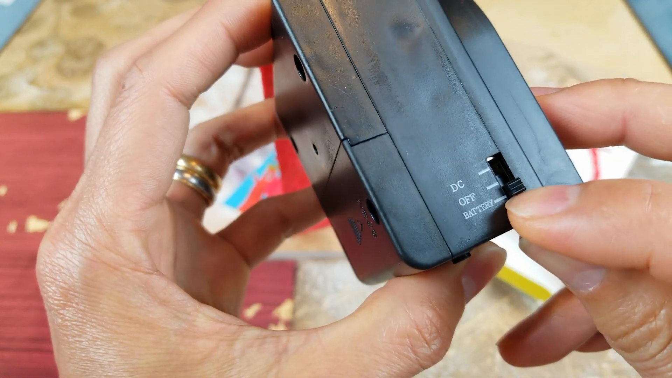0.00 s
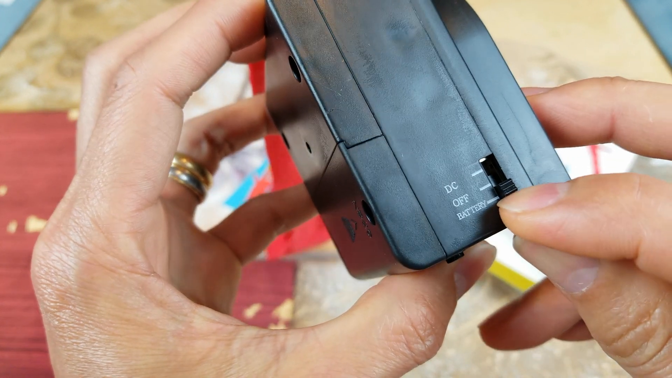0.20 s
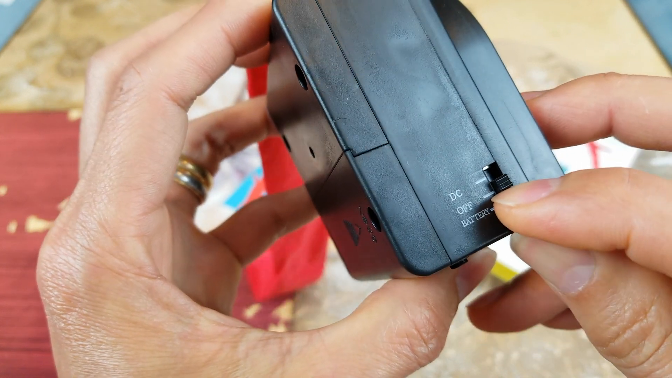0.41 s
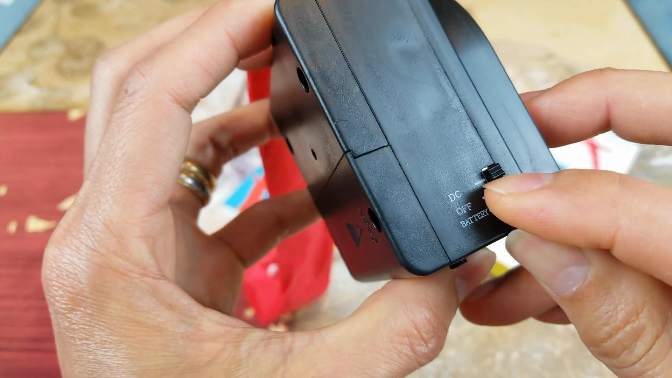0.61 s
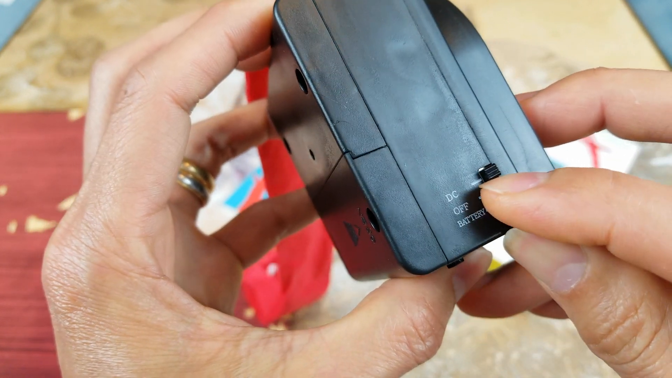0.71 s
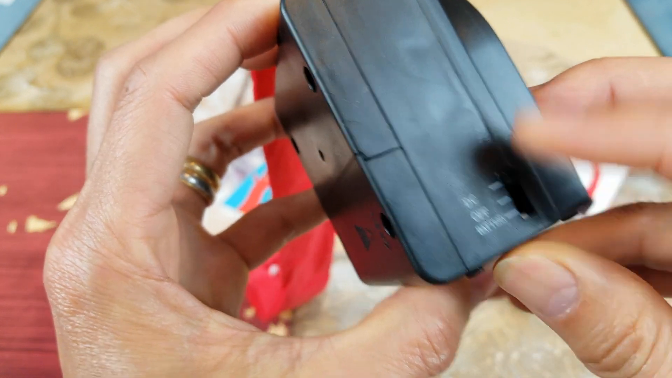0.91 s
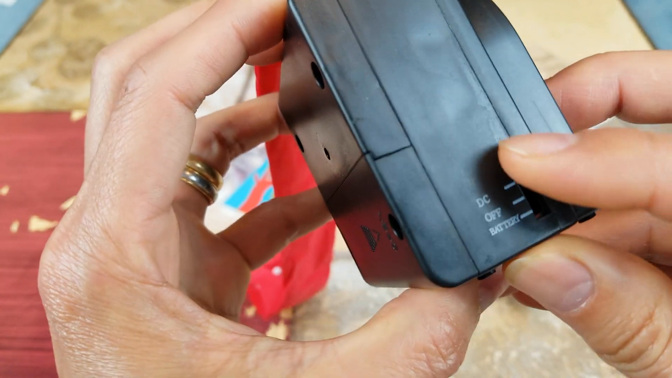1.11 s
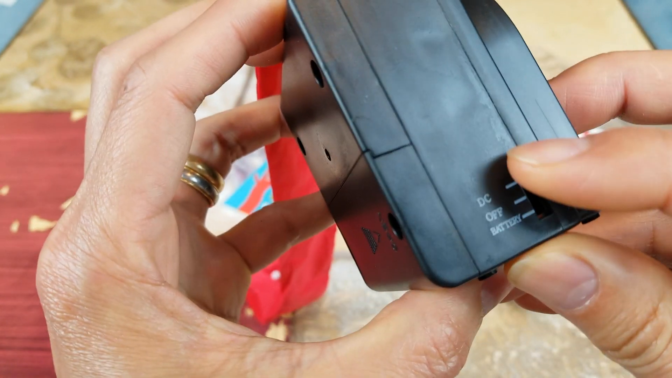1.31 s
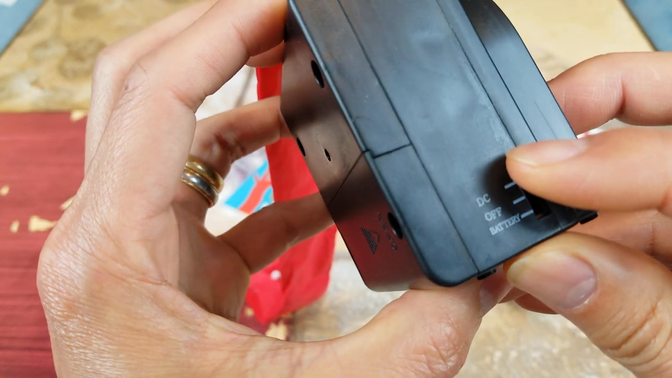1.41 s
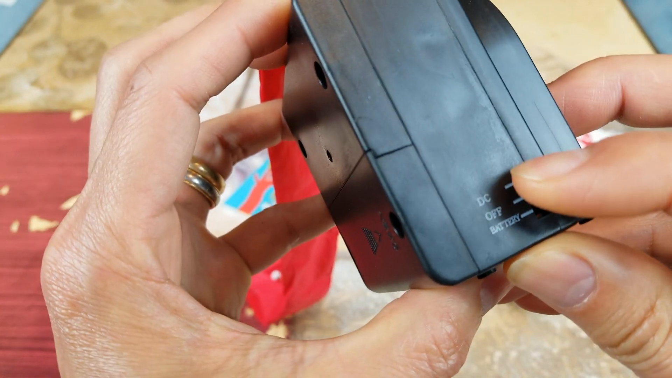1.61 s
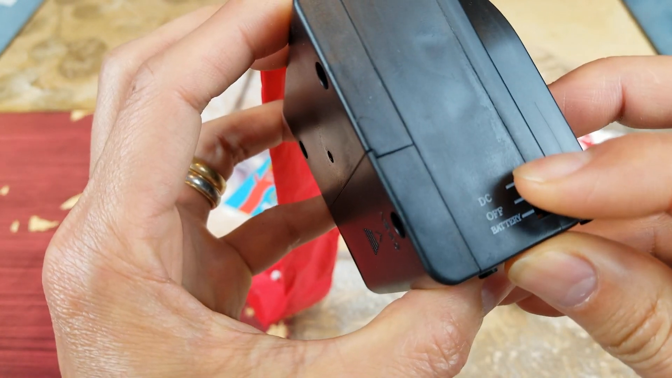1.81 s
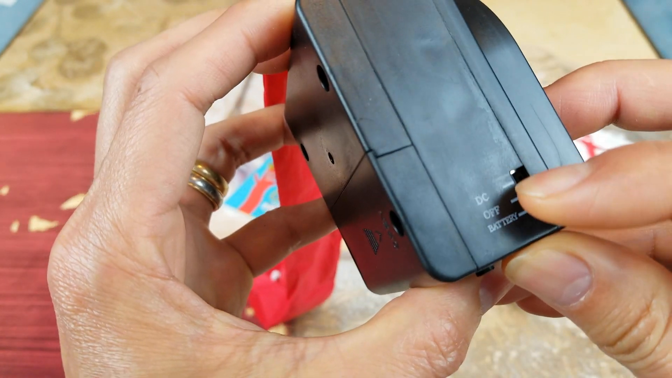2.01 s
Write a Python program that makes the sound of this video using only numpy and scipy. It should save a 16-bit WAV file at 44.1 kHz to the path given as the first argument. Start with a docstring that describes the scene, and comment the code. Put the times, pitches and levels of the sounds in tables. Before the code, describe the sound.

Small plastic slide switch flicked back and forth with four sharp clicks, close in a quiet room

```python
"""A quiet room, close to the microphone: a finger flicks the plastic slide switch of a small hand-held blower.
Four times the slider scrapes for some milliseconds, then snaps into its detent: shaped noise bursts ring the case.
Around the snaps come weaker bursts as ticks of the loose knob, grainy noise as soft finger rubs, and damped
low sines with rumble as bumps of the case in the hand. Decaying noise is the room's brief answer to each click;
low rumble and microphone hiss lie underneath."""
import sys
import numpy as np
from scipy import signal
from scipy.fft import rfft, irfft
from scipy.io import wavfile
from scipy.ndimage import uniform_filter1d

SR = 44100
rng = np.random.default_rng(int(sys.argv[2]) if len(sys.argv) > 2 else 0)


def persist_wave(psi):
    """Save psi, clipped to +-1, as 16-bit WAV."""
    counts = np.round(np.clip(psi, -1, 1) * 32767).astype(np.int16)
    wavfile.write(sys.argv[1], SR, np.atleast_2d(counts).T)


N = 92610  # 2.1 s
TOP_HZ = 15800  # hiss and room echoes stop here


def amp(db):
    """Decibels to gain."""
    return 10 ** (np.asarray(db) / 20)


def unit(x):
    """Scales to an rms of one."""
    return x / np.sqrt(np.mean(x ** 2) + 1e-20)


def read(points, hz):
    """Reads a (frequency, value) table on a logarithmic frequency axis."""
    f, value = np.transpose(points)
    return np.interp(np.log(hz + 1), np.log(f + 1), value)


def add(mix, start_s, sound):
    """Mixes a stereo sound in at a time, cut off at the end of the mix."""
    part = mix[:, round(start_s * SR):][:, :sound.shape[1]]
    part += sound[:, :part.shape[1]]


def bins(size):
    """Frequencies of a spectrum in Hz."""
    return np.fft.rfftfreq(size, 1 / SR)


def colour(x, db_at):
    """Causal minimum-phase filter whose gain in dB is a function of frequency."""
    size = 2048
    log_gain = np.log(amp(db_at(abs(np.fft.fftfreq(size, 1 / SR)))))
    spectrum = np.exp(np.conj(signal.hilbert(log_gain)))
    taps = np.fft.ifft(spectrum).real
    return signal.fftconvolve(x, taps[:size // 2])


def peak(hz, centre, width):
    """Bell curve of one resonance, one at its centre."""
    return 1 / (1 + (2 * (hz - centre) / width) ** 2)


def tilt(hz):
    """Octaves above or below the middle of the treble, held level in the bass."""
    return np.log2(np.maximum(hz, 1500) / 6000)


# steady background of the room and microphone: (frequency [Hz], relative level per Hz [dB])
FLOOR_TONE = [(25, -11), (52, -1.5), (82, 2), (140, -2.5), (210, -5), (500, -12), (1000, -13.5),
              (2100, -15.5), (4000, -19), (6000, -23), (8200, -26), (10200, -22), (12500, -15.5),
              (15500, -12.5)]
# how the background leans to the left: (frequency [Hz], left minus right [dB])
FLOOR_BALANCE = [(60, 1.1), (380, 4), (4400, 2.3), (8000, 3), (15000, 7)]
FLOOR_DB = -67  # rms of the two sides averaged
WHINE_HZ, WHINE_WIDTH_HZ, WHINE_DB = 15450, 120, 10  # a thin peak in the hiss


def background():
    """Low room rumble and microphone hiss: steady noise shaped in frequency."""
    hz = bins(N)
    tone_db = read(FLOOR_TONE, hz) + WHINE_DB * peak(hz, WHINE_HZ, WHINE_WIDTH_HZ)
    sides_db = tone_db + np.outer([0.5, -0.5], read(FLOOR_BALANCE, hz))
    noise = rng.standard_normal((2, N))
    x = irfft(rfft(noise) * amp(sides_db) * (hz < TOP_HZ), N)
    return amp(FLOOR_DB) * x / x.mean(0).std()


# how long the room rings: (frequency [Hz], time to fall 60 dB [s])
ROOM_T60 = [(500, 0.33), (1600, 0.13), (3500, 0.27), (5400, 0.31), (9200, 0.26), (15000, 0.31)]
# what the room returns: (frequency [Hz], echo against the direct sound [dB])
ROOM_TONE = [(200, -18.5), (900, -17), (1650, -8.5), (3000, -6), (4600, -6), (6300, -10), (8500, -5),
             (11000, -6), (15000, -12.5)]
# the echo on the right: (frequency [Hz], gain of the right side [dB])
ROOM_RIGHT = [(300, -6.5), (3000, -5.5), (6000, -3.5), (11000, -8), (15000, -6.5)]
ROOM_GAP_S, ROOM_BUILD_S = 0.0023, 0.0068
ROOM_GRAIN_DB, ROOM_GRAIN_S = 2, 0.03  # the first echoes arrive as separate reflections


def room_tail(tone):
    """The echo of a click: grainy at first, it builds up quickly and dies at its own speed in each band."""
    t = np.arange(SR // 2) / SR
    sizes = amp(ROOM_GRAIN_DB * np.exp(-t / ROOM_GRAIN_S) * rng.exponential(1, (2, len(t))))
    steady_sizes = sizes / np.sqrt(uniform_filter1d(sizes ** 2, size=600))
    echoes = rng.standard_normal(sizes.shape) * steady_sizes
    hz, when, z = signal.stft(echoes, SR, nperseg=256)
    t60 = read(ROOM_T60, hz)[:, None]
    tone_db = (tone(hz) + read(ROOM_TONE, hz))[:, None]
    equal_energy = np.sqrt(np.log(1e6) / t60 / SR)  # long and short decays carry the same energy
    z = z * amp(tone_db - 60 * when / t60) * equal_energy
    z[1] *= amp(read(ROOM_RIGHT, hz))[:, None]
    z = z * (hz < TOP_HZ)[:, None]
    tail = signal.istft(z, SR, nperseg=256)[1][:, :len(t)]
    return tail * np.clip((t - ROOM_GAP_S) / ROOM_BUILD_S, 0, 1) ** 0.5


# the case bumps in the hand: (time [s], level [dB], wobble frequency [Hz])
BUMPS = [(.56, -62, 70), (.857, -59, 63), (1.804, -50.5, 79.1)]
BUMP_RISE_S, BUMP_FADE_S, BUMP_RIGHT_DB = 0.016, 0.036, -4.5
BUMP_ROUGH = 0.78  # rms of the rumble beside a sine of amplitude one


def bumps():
    """The whole case rocks against the hand with a low, damped wobble."""
    out = np.zeros((2, N))
    t = np.arange(SR // 2) / SR
    envelope = np.minimum(t / BUMP_RISE_S, 1) * np.exp(-np.maximum(t - BUMP_RISE_S, 0) / BUMP_FADE_S)
    for time_s, db, hz in BUMPS:
        band = signal.butter(2, [hz / 2, hz * 2], "band", fs=SR, output="sos")
        rumble = unit(signal.sosfilt(band, rng.standard_normal((2, len(t)))))
        wobble = np.sin(2 * np.pi * hz * t) + BUMP_ROUGH * rumble
        add(out, time_s, amp([[db], [db + BUMP_RIGHT_DB]]) * envelope * wobble)
    return out


# resonances of the plastic case: (centre [Hz], width [Hz], lift [dB])
CASE = [(900, 170, 4), (1594, 160, 4.5), (2950, 600, 9), (5270, 540, 4), (6080, 400, 5.5), (6760, 300, 3),
        (8360, 400, 4.5), (10550, 650, 3.5), (12420, 710, 6.5), (13550, 400, 3), (15140, 550, 9)]


def case(hz):
    """Lift in dB that the resonances of the case give each frequency."""
    return sum(db * peak(hz, centre, width) for centre, width, db in CASE)


# finger and slider rubbing on the case: (time [s], length [s], level [dB], treble tilt [dB per octave])
RUBS = [(.05, .15, -63, -0.5), (0.199, 0.053, -61, 9), (0.821, 0.082, -62.5, 4.5), (1.509, 0.041, -67.5, 7),
        (1.989, 0.087, -75, 4)]
# colour of the friction before the case: (frequency [Hz], gain [dB])
RUB_TONE = [(300, -13), (2200, -16), (3050, -0.5), (3700, -3.5), (4800, 1.5), (6000, 2.5), (7200, -6.5),
            (11000, -5), (15000, -13)]
RUB_RIGHT_DB = -6.5


def rubs():
    """Fine friction grains pass through the case under one soft swell."""
    out = np.zeros((2, N))
    for time_s, length_s, db, slope in RUBS:
        n = round(length_s * SR)
        swell = np.sin(np.linspace(0, np.pi, n))
        grains = rng.standard_normal((2, n)) * amp(2.5 * rng.exponential(1, n)) * swell

        def tone(hz):
            return read(RUB_TONE, hz) + case(hz) + slope * tilt(hz)

        sound = np.array([colour(side, tone) for side in grains])
        add(out, time_s, amp(db) * unit(sound) * amp([[0], [RUB_RIGHT_DB]]))
    return out


def favoured(ring_hz, ring_db):
    """Lift in dB of the one resonance that a blow excites most, as a function of frequency."""
    return lambda hz: ring_db * peak(hz, ring_hz, width=500)


def burst(envelope, tone):
    """Dense random ringing under an envelope, evened out in frequency and then given a tone in dB."""
    x = envelope * rng.standard_normal(len(envelope))
    power = uniform_filter1d(abs(rfft(x)) ** 2, size=21)

    def even_tone(hz):
        return tone(hz) - 10 * np.log10(np.interp(hz, bins(len(x)), power) + 1e-9)

    return colour(x, even_tone)


# the click as heard on the right: (frequency [Hz], gain against the left [dB])
RIGHT_TONE = [(200, -2.5), (1200, -1), (3000, 1.5), (5000, -0.5), (8000, 2), (11000, 1), (15000, 1)]
# a click rises, chatters (on the left), then dies away
RISE_S, CHATTER_S, RING_S, RIGHT_RING_S = 0.00033, 0.00092, 0.0012, 0.0019
SLIDE_RIGHT_DB = -2.5
BASS_CUT_HZ = 170  # a small case radiates little below this
# heard from all directions, a click's tone and the case's resonances even out
ROOM_TONE_SHARE, ROOM_CASE_SHARE = 0.81, 0.73


def strike(tone, ring, right_db, room_db, slide_s, slide_db):
    """A growing scrape, then plastic hits plastic and rings case and room; returns lead time and both sides."""
    lead_s = 0.012  # room for the scrape before the blow at t = 0
    t = np.arange(0, 3 * lead_s, 1 / SR) - lead_s
    scrape = amp(slide_db) * np.clip(1 + t / slide_s, 0, 1) ** 0.72 * (t < RISE_S)
    rise = np.clip(t / RISE_S, 0, 1)
    left = scrape + rise * np.exp(-np.maximum(t - CHATTER_S, 0) / RING_S)
    right = amp(SLIDE_RIGHT_DB) * scrape + rise * np.exp(-np.maximum(t, 0) / RIGHT_RING_S)

    def left_tone(hz):
        return tone(hz) + case(hz) + ring(hz)

    def right_tone(hz):
        return tone(hz) + case(hz) + read(RIGHT_TONE, hz) + right_db

    def echo_tone(hz):
        return ROOM_TONE_SHARE * tone(hz) + ROOM_CASE_SHARE * case(hz) + room_db

    sound = np.zeros((2, SR * 3 // 5))
    add(sound, 0, np.array([burst(left, left_tone), burst(right, right_tone)]))
    add(sound, lead_s, room_tail(echo_tone))
    bass_cut = signal.butter(1, BASS_CUT_HZ, "high", fs=SR, output="sos")
    return lead_s, signal.sosfilt(bass_cut, sound)


# light ticks of the knob:
# (time [s], level [dB], treble tilt [dB per octave], favoured resonance [Hz], its lift [dB])
TICKS = [(.1555, -38, 6, 13500, 6), (0.2186, -35.5, 3.5, 6000, 3), (0.853, -31.5, -2.5, 3000, 8),
         (0.8559, -18, 1, 3000, 8), (0.896, -18.5, 2.5, 5600, 9.5), (1.0372, -41.5, 2, 7000, 4),
         (1.511, -32.5, -1, 6300, 2), (1.514, -32, 1, 8300, 0), (2.0024, -47, 4, 6000, -3),
         (2.0179, -32.5, -2.5, 10500, 11.5), (2.039, -42, 8, 6000, -2)]
# colour shared by the ticks: (frequency [Hz], gain [dB])
TICK_TONE = [(200, -5), (850, -1), (1600, -7.5), (3000, -6), (4500, -5), (5800, 2), (8500, -4.5),
             (11000, -4.5), (15000, -13.5)]
TICK_RIGHT_DB, TICK_ROOM_DB = -7, 4


def ticks():
    """The knob shifts in its play as the finger takes or leaves it."""
    out = np.zeros((2, N))
    for time_s, db, slope, ring_hz, ring_db in TICKS:
        def tone(hz):
            return read(TICK_TONE, hz) + slope * tilt(hz)

        lead_s, sound = strike(tone, favoured(ring_hz, ring_db), TICK_RIGHT_DB, TICK_ROOM_DB,
                               slide_s=0.0028, slide_db=-17.5)
        add(out, time_s - lead_s, amp(db) * sound)
    return out


# snaps of the slider: (time [s], slide before it [s], slide against the snap [dB], right side [dB], room [dB],
# favoured resonance [Hz], its lift [dB], then the tone [dB] at each of SNAP_TONE_HZ)
SNAPS = [(0.2453, 0.0015, -34.5, -13.5, 0.7, 10800, 4.7, -10, -1, -2.5, -3.5, -2.5, -5.5, -0.5, 2, 12.2, 14),
         (0.5593, 0.0097, -28, -11, -0.4, 10140, 12.4, 0.5, -3.5, -16, -20, -10, -5.5, 0, 3, 5.6, 4.2),
         (1.5436, .004, -28, -12, -1.6, 6830, 4.8, -21.5, -18.5, -12, -13, -11.5, -7, 8, 10.4, 11, 10),
         (1.8005, .0045, -17, -7.5, 1, 1610, 5.5, -10.5, -5.5, -4, -6.5, 0, 1, 12, 5.3, 6.8, 10.1)]
# where the tone of a snap is given: (frequency [Hz])
SNAP_TONE_HZ = [170, 450, 850, 1250, 1850, 3300, 6200, 9200, 10800, 15000]


def snaps():
    """The slider drops into a detent; each snap has its own tone."""
    out = np.zeros((2, N))
    for time_s, slide_s, slide_db, right_db, room_db, ring_hz, ring_db, *tone_db in SNAPS:
        def tone(hz):
            return read(list(zip(SNAP_TONE_HZ, tone_db)), hz)

        lead_s, sound = strike(tone, favoured(ring_hz, ring_db), right_db, room_db, slide_s, slide_db)
        add(out, time_s - lead_s, sound)
    return out


def scene():
    """The switch and the handling over the quiet room."""
    return background() + bumps() + rubs() + ticks() + snaps()


def record(dry):
    """Full-scale limit, then a low-pass as band limit."""
    low_pass = signal.firwin(255, 16450, window=("kaiser", 9), fs=SR)
    return signal.oaconvolve(np.clip(dry, -1, 1), low_pass[None], "same")


dry = scene()
out = record(dry)
persist_wave(out)
```